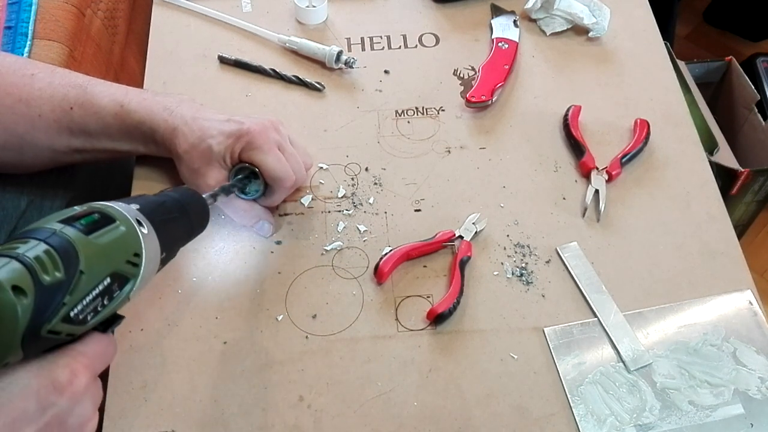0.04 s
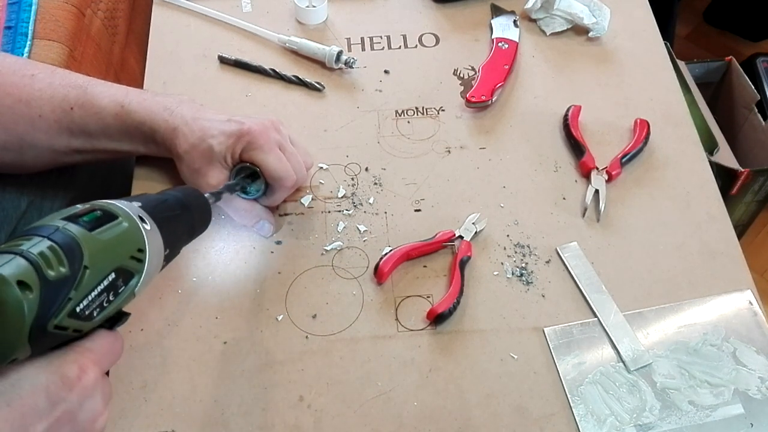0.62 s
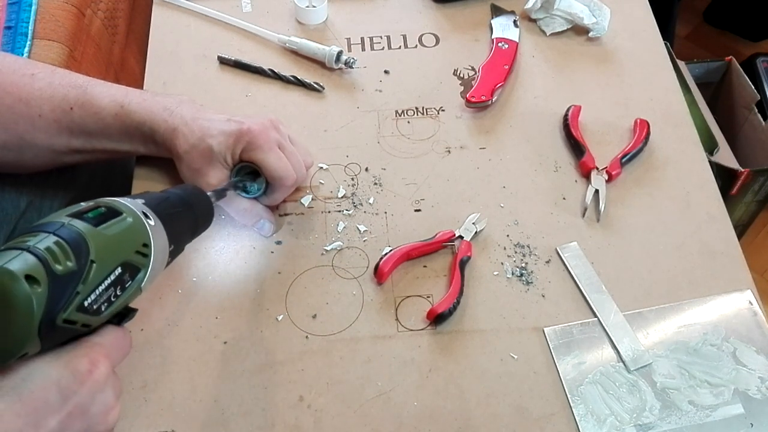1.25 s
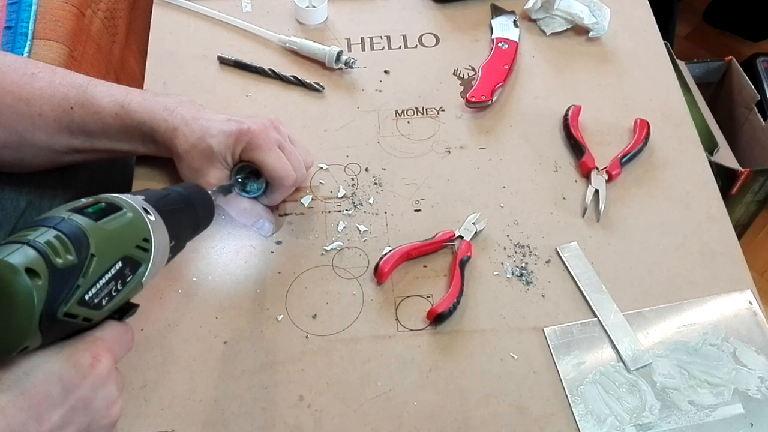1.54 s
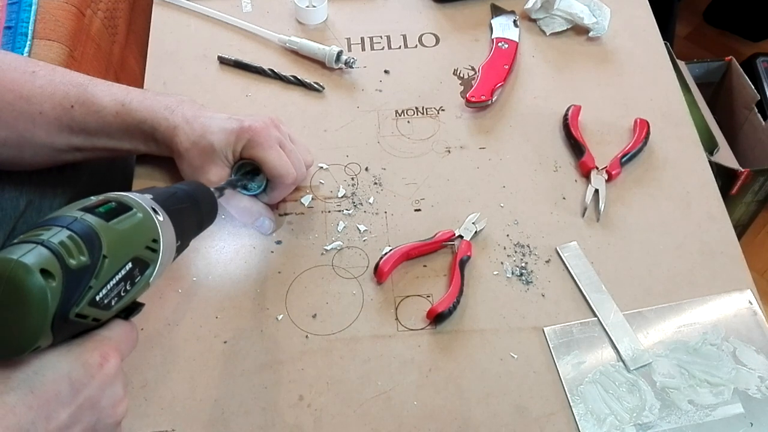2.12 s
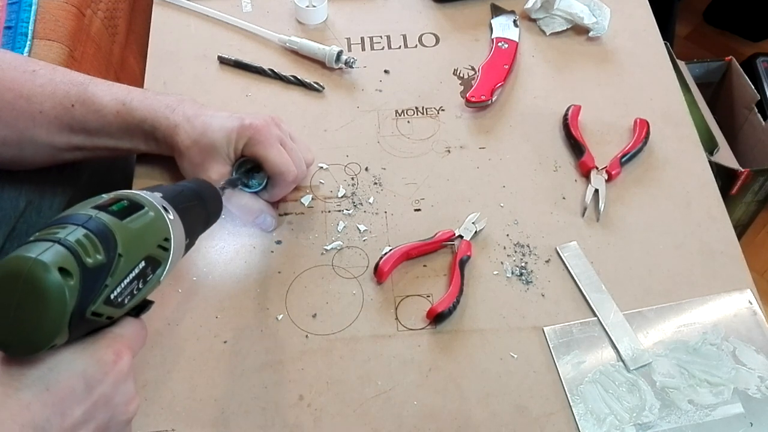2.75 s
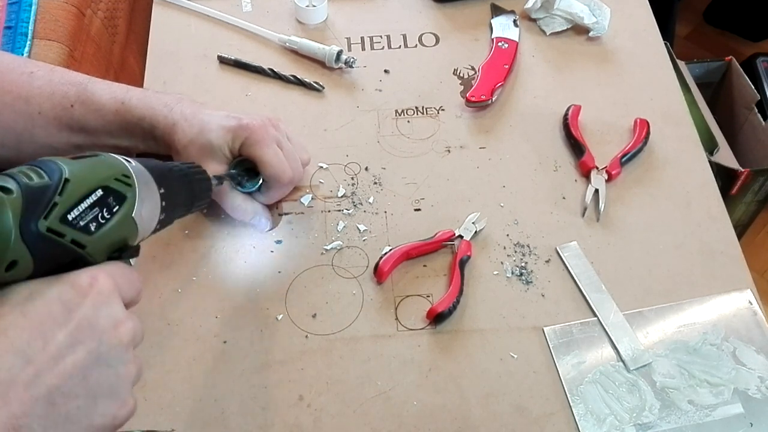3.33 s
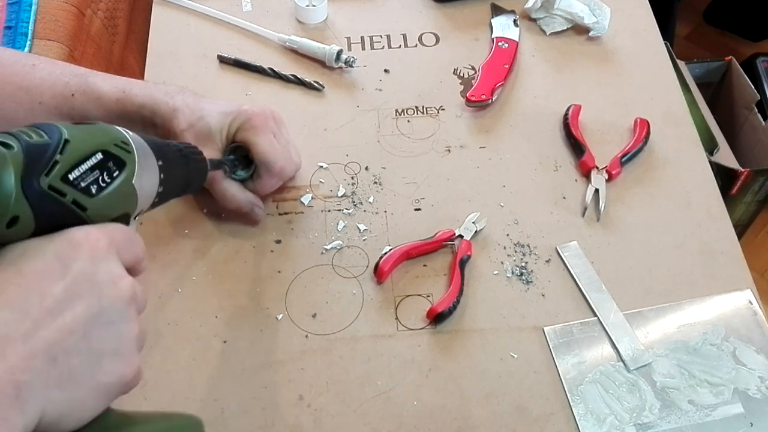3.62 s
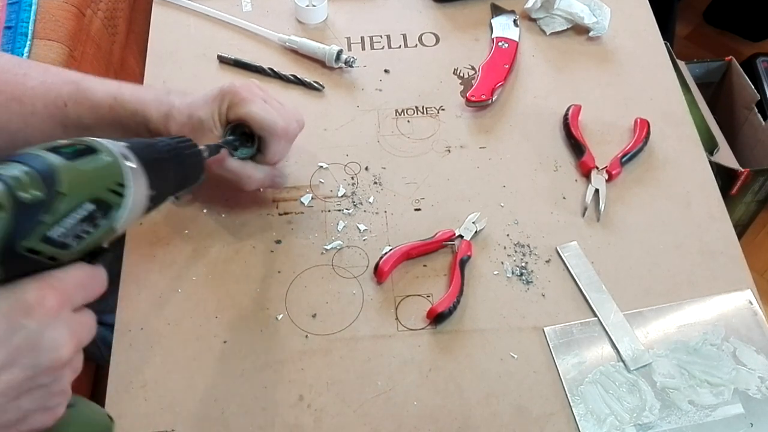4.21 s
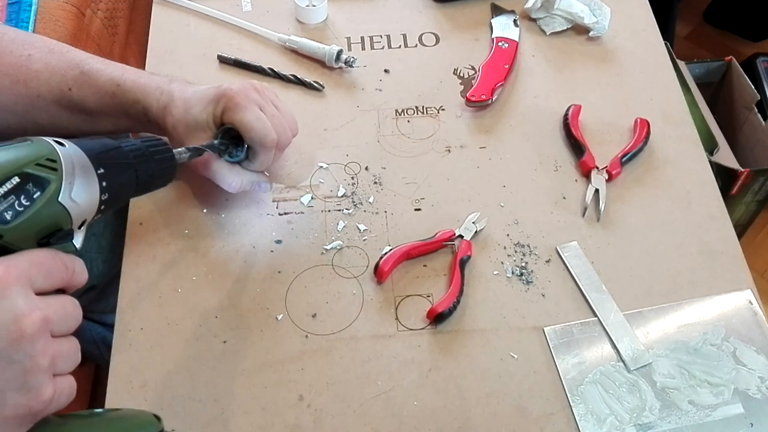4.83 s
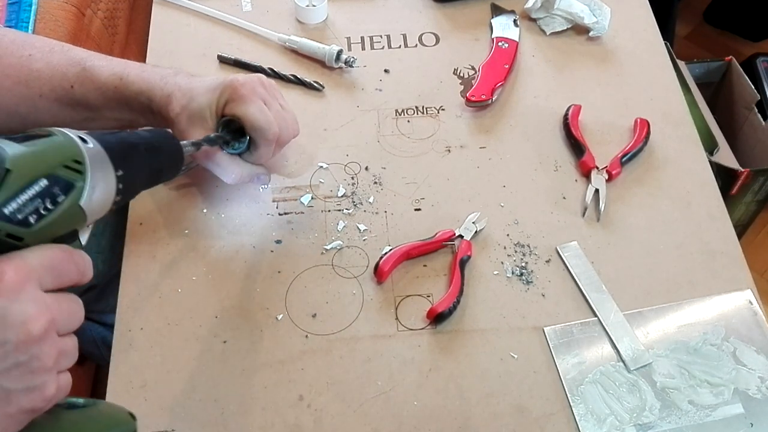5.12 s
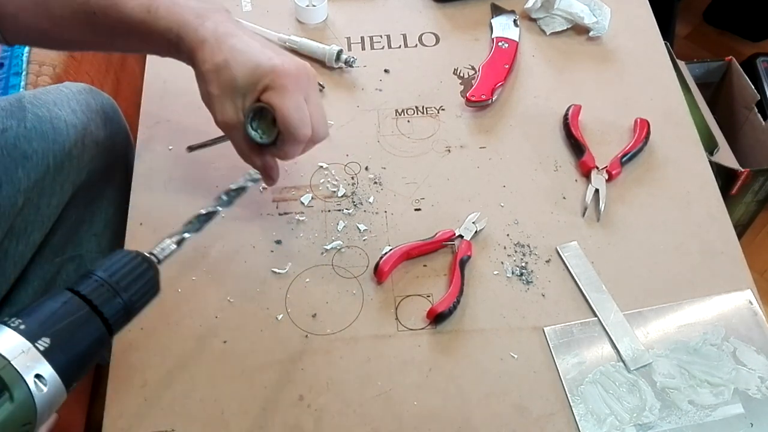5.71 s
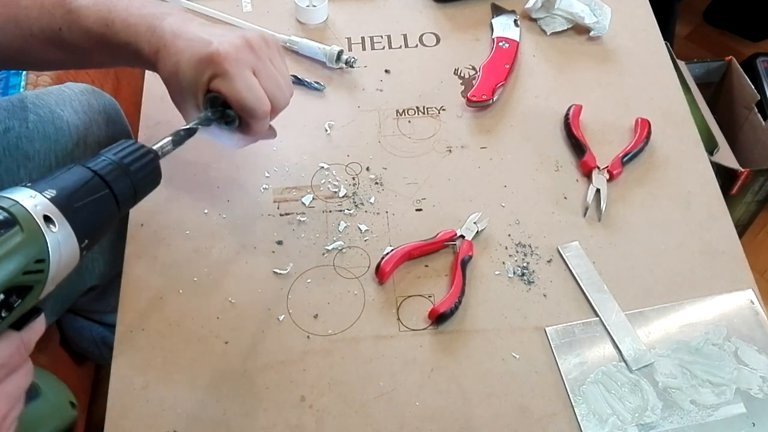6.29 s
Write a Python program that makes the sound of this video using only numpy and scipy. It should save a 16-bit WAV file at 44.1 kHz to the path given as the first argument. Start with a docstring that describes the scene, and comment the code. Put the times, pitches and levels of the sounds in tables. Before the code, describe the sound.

A cordless drill reams a tube with a sped-up, high pulsing whine, stops, then gives short trigger blips with clicks and ringing workbench knocks.

```python
"""At a workbench in a small room, a cordless drill reams a tube. Its meshing gears give tones over a
chatter of teeth. After half a second everything runs about four times as fast: the growl jumps to a
shrill whine that throbs as the bit binds once a chuck turn, over the scrape of the flutes, then winds down.
Short blips of the trigger follow, with clicks and ringing knocks of bit and tube, over a faint hum."""
import sys
import numpy as np
from scipy import signal
from scipy.fft import rfft, irfft, next_fast_len
from scipy.io import wavfile
from scipy.ndimage import uniform_filter1d

SR = 44100
rng = np.random.default_rng(int(sys.argv[2]) if len(sys.argv) > 2 else 0)


def waveform_to_disk(signal):
    """Save audio, clipped to [-1, 1], as 16-bit WAV at the path in sys.argv[1]."""
    frames = np.transpose(np.atleast_2d(signal))
    scaled = np.clip(frames, -1, 1) * 32767
    samples = np.round(scaled).astype(np.int16)
    wavfile.write(sys.argv[1], SR, samples)


N = 288855
TIME = np.arange(N) / SR
JUMP_S, SPEED_UP = 0.4695, 4.4
MESHES_PER_TURN, FIRST_BIND_S = 267.9, .477
FULL_HZ, SPEED_POWER = 2927, 2.27  # amplitude grows as this power of the mesh rate
ROOM_T60_S, TOP_HZ = 0.079, 15750


def drill_fast():
    """Load modulation: the bit binds once a turn, so speed and level throb until the drill runs free."""
    ream_hz, ream_gain = reaming_motor()
    free_hz, free_gain = free_motor()
    release_s, sag_share, sag_lag_turns = 3.08, 0.0116, .17
    chuck = chuck_turns(ream_hz, FIRST_BIND_S)
    load = np.clip((release_s - TIME) / 0.047, 0, 1)
    bind = np.cos(2 * np.pi * chuck) * load
    sag = sag_share * np.cos(2 * np.pi * (chuck - sag_lag_turns))
    mesh_hz = ream_hz * (1 - sag) + free_hz
    hardness = np.clip((mesh_hz - 700) / 1500, 0, 1)
    whine = reaming_whine(mesh_hz, bind)
    chirps = free_chirps(mesh_hz)
    chatter = tooth_chatter(mesh_hz, hardness)
    reaming = whine + chatter * undb(-3.5 + .5 * bind)
    free = chirps + chatter * undb(-1 - 1.5 * hardness)
    return (load * reaming + (1 - load) * free) * (ream_gain + free_gain)


# Gear tones under load. Each row: multiple of the mesh rate, relative level in dB.
LOADED_ORDERS = [(1, 1.5), (1.19, -16.5), (1.9, -10), (1.97, -8), (2, 0.5), (2.05, -9), (3, -3.5),
                 (3.31, -29), (3.53, -24.5), (3.94, -6.5), (4.031, -14), (5, -8), (6, -5)]
# Housing response at the fast pace. Each row: frequency in Hz, gain in dB.
HOUSING_FAST = [(300, -25), (1200, -24.5), (2150, -20), (2550, -11.5), (3000, -5.5), (3300, -6.5),
                (4500, -4.5), (5750, 1), (6500, -4), (7900, -6), (9000, -5), (11700, 1), (13400, -7),
                (15500, -7)]
def reaming_whine(mesh_hz, bind):
    """Source and filter: the tones of loaded gears radiate through gearbox and housing."""
    tones = gears(LOADED_ORDERS, mesh_hz, SPEED_UP, wobble=0.00405, rough=0.41, flutter_db=3.04)
    tones = room(gearbox(tones, SPEED_UP), ROOM_T60_S, wet_db=-6.5)
    whine = steady(colour(tones, HOUSING_FAST), seconds=0.051)
    # the lowest tone grows with speed and stays firm while the upper ones throb
    lowest = resonate(whine, hz=2766, width=370)
    upper = (whine - lowest) * undb(-1.0 + 3.23 * bind)
    return lowest * undb(np.interp(mesh_hz, [2650, 3000], [-6, 0])) + upper


# Speed while reaming. Each row: time in seconds, mesh rate before drag in Hz.
REAM_SPEED = [(.47, 2745), (1.15, 2775), (1.39, 2654.5), (1.43, 2930), (1.62, 3020), (2.96, 2925.5),
              (3.03, 2446), (3.063, 2018.5), (3.078, 1425.5), (3.19, -1)]
# Loudness while reaming. Each row: time in seconds, level in dB before throb and fade.
REAM_LEVEL = [(.47, -43), (1.35, -42.5), (1.54, -40), (1.6, -44), (1.9, -44), (2.15, -41), (2.95, -40),
              (3.03, -37), (3.08, -33.5)]
# Snags of the bit. Each row: centre in seconds, half length in seconds, share of speed lost.
BIT_SNAGS = [(0.492, .015, .08), (0.649, .035, 0.041), (0.934, .013, 0.094), (0.986, .025, .1),
             (1.549, .026, .12)]
def reaming_motor():
    """Load torque: snags drag the mesh rate down, and the gain dies away as the motor slows."""
    fade_below_hz = 2150
    drag = sum(share * np.exp(-((TIME - s) / half_s) ** 2) for s, half_s, share in BIT_SNAGS)
    mesh_hz = curve(REAM_SPEED) * (1 - drag)
    run_down = np.clip(mesh_hz / fade_below_hz, 0, 1) ** SPEED_POWER
    return mesh_hz, undb(curve(REAM_LEVEL)) * run_down


def chuck_turns(mesh_hz, from_s):
    """Gear reduction: the integrated mesh rate gives the turns of the chuck since from_s."""
    turns = np.cumsum(mesh_hz) / SR / MESHES_PER_TURN
    return turns - np.interp(from_s, TIME, turns)


def gears(orders, mesh_hz, pace, wobble, rough, flutter_db):
    """Gear meshing: tones at multiples of the tooth rate, shaken by backlash in speed, phase and level."""
    cycles = np.cumsum(mesh_hz * (1 + wobble * walk(40 * pace))) / SR
    out = np.zeros(N)
    for order, db in orders:
        shake = rough * order * walk(70 * pace)
        gain = undb(db + flutter_db * walk(45 * pace))
        below_top = order * mesh_hz < TOP_HZ
        out += below_top * gain * np.sin(2 * np.pi * order * cycles + shake)
    return out


# Gearbox modes at a pace of 1. Each row: frequency in Hz, bandwidth in Hz, gain in dB.
GEARBOX_RESONANCES = [(693, 17, 1), (1243, 140, -2.5), (1664, 20, 14), (2840, 330, -11)]
def gearbox(tones, pace):
    """Forced resonance: a tone flares as it crosses a mode of the gearbox."""
    return tones + sum(undb(db) * resonate(tones, hz * pace, width * pace)
                       for hz, width, db in GEARBOX_RESONANCES)


# Spectrum of barely turning gears. Each row: frequency in Hz, gain in dB.
IDLE_SPECTRUM = [(1000, -21), (2100, -18.5), (2900, -13), (4000, 1), (5500, 1), (7000, -6), (9000, -11),
                 (10500, -7), (11600, -2.5), (13000, -16), (15500, -20)]
def tooth_chatter(mesh_hz, hardness):
    """Impact noise: a slow motor hits its teeth softly, so its chatter is duller."""
    teeth = room(rattle(mesh_hz, SPEED_UP, depth=0.16, grain_db=2.5), ROOM_T60_S, wet_db=-4.0)
    bright, dull = unit(colour(teeth, HOUSING_FAST)), unit(colour(teeth, IDLE_SPECTRUM))
    return hardness * bright + (1 - hardness) * dull


def rattle(mesh_hz, pace, depth, grain_db):
    """Amplitude modulation: the noise of teeth and brushes pulses once a motor turn."""
    motor_turns = np.cumsum(mesh_hz) / SR / 5  # five meshes a turn
    pulse = 1 + depth * np.cos(2 * np.pi * motor_turns)
    return unit(rng.standard_normal(N) * pulse * undb(grain_db * walk(110 * pace)))


# Gear tones off load. Each row: multiple of the mesh rate, relative level in dB.
UNLOADED_ORDERS = [(1, 3.5), (2, 1), (2.4, -12), (3, -4), (3.5, -9.5), (4, -2.5), (5, -6), (6, -5.5)]
def free_chirps(mesh_hz):
    """Swept excitation: unloaded gear tones glide through one housing resonance, weaker at low speed."""
    tones = gears(UNLOADED_ORDERS, mesh_hz, SPEED_UP, wobble=.012, rough=.36, flutter_db=5)
    ring = undb(3.2) * resonate(tones, hz=3970, width=630)
    radiated = colour(room(tones + ring, ROOM_T60_S, wet_db=-16.0), HOUSING_FAST)
    chirps = steady(band(radiated, 3250, 21000), seconds=0.017)
    return chirps * undb(np.interp(mesh_hz, [700, 1700], [-10, -4]))


# Trigger squeezes. Each row: start in seconds, hold in seconds, target mesh rate in Hz,
# level at press and level at release in dB as at steady full speed.
TRIGGER_SQUEEZES = [(3.203, .03, 451.3, -35, -31), (3.268, .03, 451.4, -36, -32),
                    (3.394, 0.069, 642, -36, -40), (3.477, .04, 707, -25, -36.5),
                    (3.697, .042, 1035, -17.5, -30), (3.74, 0.022, 2197, -37, -32.5),
                    (3.952, 0.052, 1203, -26, -30), (4.012, 0.02, 2370, -31, -33.5),
                    (4.153, .056, 641, -27.5, -35.5), (4.306, .092, 913, -28, -41.5),
                    (4.497, 0.061, 764, -30.5, -33.5), (4.575, 0.067, 745, -27.5, -34.5),
                    (5.062, .075, 1017, -37, -40.5), (5.136, .024, 1750, -42, -38),
                    (5.158, 0.033, 2992, -42.5, -39), (5.282, .048, 1846, -29.5, -39.5),
                    (5.33, .075, 1960, -42.5, -52.5), (5.97, .065, 1651, -50.5, -44),
                    (6.036, .035, 2494, -53, -51), (6.072, .04, 2830, -46.5, -43),
                    (6.112, .068, 3124, -51, -52.5), (6.18, .062, 2925, -46.5, -40.5),
                    (6.324, 0.058, 846, -33.5, -45), (6.379, 0.023, 2101, -42, -43),
                    (6.404, 0.079, 3000, -44.5, -51)]
def free_motor():
    """First-order lag: each squeeze pulls the mesh rate towards a target, then the brake slows it."""
    spin_up_s, brake_hz_per_s = .018, 27000
    mesh_hz, db = np.zeros(N), np.zeros(N)
    for s, held_s, target_hz, press_db, release_db in TRIGGER_SQUEEZES:
        start = int(s * SR)
        t = TIME[:N - start]
        held = np.minimum(t, held_s)
        driven = target_hz + (mesh_hz[start] - target_hz) * np.exp(-held / spin_up_s)
        mesh_hz[start:] = np.maximum(driven - brake_hz_per_s * (t - held), 0)
        db[start:] = press_db + (release_db - press_db) * held / held_s
    # gears strained by speeding up or braking are louder
    strain = 1 + 0.46 * np.abs(np.gradient(mesh_hz)) * SR / brake_hz_per_s
    gain = undb(db) * (mesh_hz / FULL_HZ) ** SPEED_POWER * strain
    return mesh_hz, uniform_filter1d(gain, SR // 100)


# Speed before the jump. Each row: time in seconds, mesh rate in Hz.
SLOW_SPEED = [(0, 668.3), (.07, 646), (.1, 680), (.16, 658), (.24, 650), (.33, 554.5), (.41, 565),
              (.43, 624)]
# Housing response before the jump. Each row: frequency in Hz, gain in dB.
HOUSING_SLOW = [(60, -19), (165, -8), (380, -14), (640, -8.5), (1320, 0), (1550, -2.5), (2100, -7.5),
                (2700, 1.5), (3700, -6.5), (5000, -7), (7000, -14.5), (10000, -27), (14000, -28),
                (15000, -60)]
def drill_slow():
    """Gear meshing at natural pace: a growl and a thin whistle swell as the bit bites four times a turn."""
    whistle_hz, level_db, bite_db = 5915, -42.5, 1.3
    mesh_hz = curve(SLOW_SPEED)
    tones = gears(LOADED_ORDERS, mesh_hz, pace=1.0, wobble=.006, rough=0.4, flutter_db=4.3)
    tones = band(gearbox(tones, pace=0.99), 1000, 14000)
    tones = room(tones, ROOM_T60_S * SPEED_UP, wet_db=-6.0)
    chatter = rattle(mesh_hz, pace=0.7, depth=0.14, grain_db=0.5)
    growl = steady(colour(tones, HOUSING_SLOW), 0.13) + undb(-3.0) * unit(colour(chatter, HOUSING_SLOW))
    whistle = undb(-15 + 1.5 * walk(33)) * np.sin(2 * np.pi * whistle_hz * TIME + walk(29))
    bite = np.cos(2 * np.pi * 4 * chuck_turns(mesh_hz, from_s=0.049))
    return (steady(growl, 0.035) + whistle) * undb(level_db + bite_db * bite)


# Loudness of the cut. Each row: time in seconds, level in dB.
SCRAPE_LEVEL = [(.47, -63), (.9, -63.5), (1.4, -59.5), (1.9, -62.5), (2.2, -65.5), (2.6, -72),
                (2.95, -69.5), (3.1, -104)]
# Spectrum of the cut. Each row: frequency in Hz, gain in dB.
SCRAPE_SPECTRUM = [(60, -15), (170, -13.5), (450, -4), (640, 1), (800, -12), (1200, -7), (2000, -19.5)]
def cutting():
    """Friction noise: the two flutes scrape the tube in low, uneven pulses."""
    flute_db, lag_turns = 1.5, .1
    mesh_hz, _ = reaming_motor()
    chuck = chuck_turns(mesh_hz, FIRST_BIND_S)
    pulse_db = flute_db * np.cos(2 * np.pi * 2 * (chuck - lag_turns))
    scrape = rng.standard_normal(N) * undb(pulse_db + 2.7 * walk(90) + 1.4 * walk(14))
    return unit(colour(scrape, SCRAPE_SPECTRUM)) * swell(SCRAPE_LEVEL)


# Contacts of trigger, bit and tube. Each row: start in seconds, level in dB with the energy
# spread over 4 ms, relative gain of the top band in dB, 60 dB decay time in seconds.
CONTACTS = [(3.415, -64, -15, 0.0048), (3.5323, -50, 0, 0.0029), (3.5782, -45, -8, 0.0054),
            (3.7429, -32, -11, 0.011), (3.745, -29, 33, 0.026), (3.8452, -42, 6, 0.0055),
            (3.878, -44, 1.5, 0.0021), (3.883, -46.5, -9, 0.0028), (3.922, -61, 8, .003),
            (4.0502, -32, -2, 0.0036), (4.099, -57, -9, 0.0036), (4.349, -54, -4, .01),
            (4.935, -54, -4, 0.031), (4.9968, -52, -1, .003), (5.0021, -42.5, -10, 0.0052),
            (5.006, -41, 5, 0.0019), (5.683, -67, 2, 0.0089), (5.738, -53.5, 9, 0.017),
            (5.803, -47.5, 1, 0.013), (5.813, -53, -24, 0.0015), (5.870, -60.5, 9, 0.0069)]
def clicks():
    """Hard impact: a brief contact has a broad spectrum, a bright snap with little body."""
    out, t = np.zeros(N), TIME[:SR // 10]
    for s, db, top_db, t60 in CONTACTS:
        burst = rng.standard_normal(len(t)) * fade(t, t60)
        top = undb(top_db) * band(burst, 11100, 16400)
        body = undb(-21) * band(burst, 930, 2100)
        snap = band(burst, 4180, 6450) + top + body
        rms = np.sqrt(np.sum(snap ** 2) / (.004 * SR))
        add(out, s, undb(db) * snap / rms)
    return room(out, ROOM_T60_S, wet_db=-3.0)


# Knocks as the bit catches in the tube. Each row: start in seconds, gain in dB, relative gain of the thud in
# dB, # 60 dB decay time in seconds.
BIT_KNOCKS = [(3.743, -33.5, -15, 0.038), (3.882, -41.5, -18, .03), (4.023, -42, 7.5, 0.058),
              (4.034, -34, 4, 0.051), (4.052, -33.5, -1.5, 0.031), (5.181, -44.5, -28, 0.056),
              (5.522, -35, -34, 0.045), (6.248, -38.5, -10.5, 0.093)]
# Modes of the tube. Each row: frequency in Hz, bandwidth in Hz, gain in dB.
TUBE_RESONANCES = [(675, 71, 0.5), (1190, 260, 1), (2380, 820, -13), (4500, 840, -9.5), (5390, 89, 10),
                   (6800, 990, 3), (8300, 370, 1.5), (13600, 620, -17), (13700, 2000, 4.5)]
def knocks():
    """Modal ringing: when the bit catches, the tube rings over a dull low thud."""
    out, t = np.zeros(N), TIME[:SR // 5]
    for s, db, thud_db, t60 in BIT_KNOCKS:
        blow = rng.standard_normal(len(t)) * fade(t, t60)
        ring = sum(undb(mode_db) * resonate(blow, hz, width) for hz, width, mode_db in TUBE_RESONANCES)
        thud = undb(thud_db) * band(blow, 180, 690)
        add(out, s, undb(db) * (ring + thud))
    return room(out, ROOM_T60_S, wet_db=-8)


# Loudness of the hum. Each row: time in seconds, level in dB.
HUM_ENVELOPE = [(.5, -81.5), (1.4, -73.5), (4.5, -82), (6.5, -79)]
# Spectrum of the room tone. Each row: frequency in Hz, gain in dB.
ROOM_SPECTRUM = [(15, -49), (25, -14.5), (58, -18.5), (87, -11), (130, -7.5), (175, -13), (1130, -17),
                 (1700, -27.5), (1840, -28), (2550, -26), (13600, -29), (14800, -30.5), (16000, -22)]
def background():
    """Noise floor: faint broadband room tone and a hum that wavers in phase and level."""
    hum_hz, room_db = 118.3, -74.5
    hum = np.sin(2 * np.pi * hum_hz * TIME + 0.53 * walk(7.6)) * undb(2 * walk(24))
    room_tone = colour(rng.standard_normal(N), ROOM_SPECTRUM)
    return undb(room_db) * unit(room_tone) + undb(curve(HUM_ENVELOPE)) * unit(hum)


def room(x, t60, wet_db):
    """Reverberation: a diffuse, decaying tail follows the direct sound."""
    t = TIME[:SR // 2]
    tail = rng.standard_normal(len(t)) * fade(t, t60) * (1 - fade(t, t60 / 10))
    return x + undb(wet_db) * signal.fftconvolve(x, tail / np.linalg.norm(tail))[:N]


def resonate(x, hz, width):
    """Second-order resonance, gain 1 at its centre."""
    return signal.lfilter(*signal.iirpeak(hz, hz / width, SR), x)


def colour(x, points):
    """Spectral shaping by (Hz, dB) points."""
    hz, db = np.transpose(points)
    size = 2 * next_fast_len(len(x) // 2 + 2048)
    freq = np.maximum(np.fft.rfftfreq(size, 1 / SR), 1)
    gain = undb(np.interp(np.log(freq), np.log(hz), db))
    return irfft(rfft(x, size) * gain)[:len(x)]


def band(x, lo_hz, hi_hz):
    """Causal band-pass filtering."""
    return signal.sosfilt(signal.butter(2, [lo_hz, hi_hz], "band", fs=SR, output="sos"), x)


def steady(x, seconds):
    """Division by the running rms holds the slow level at 1 and keeps the fast flutter."""
    return x / np.sqrt(np.abs(uniform_filter1d(x ** 2, int(seconds * SR))) + 1e-12)


def fade(t, t60):
    """Exponential decay, 60 dB in t60."""
    return np.exp(-np.log(1000) * t / t60)


def walk(rate):
    """Interpolated noise of rms 1, with rate new values a second."""
    return unit(np.interp(TIME * rate, np.arange(N), rng.standard_normal(N)))


def curve(rows):
    """Linear interpolation of (s, value) rows."""
    return np.interp(TIME, *np.transpose(rows))


def swell(rows):
    """Gain envelope of (s, dB) rows, silent outside them."""
    db = np.interp(TIME, *np.transpose(rows), left=-200, right=-200)
    return uniform_filter1d(undb(db), 64)


def undb(db):
    """Decibels to gain."""
    return 10 ** (np.asarray(db) / 20)


def unit(x):
    """Normalisation to rms 1."""
    return x / np.sqrt(np.mean(x ** 2))


def add(out, s, sound):
    """Superposition of a sound starting at time s."""
    start = int(s * SR)
    out[start:start + len(sound)] += sound[:N - start]


def scene():
    """Superposition: the slow drill gives way to the fast one and its surroundings, in both channels."""
    fast = np.clip((TIME - JUMP_S) * 1000, 0, 1)  # 1 ms crossfade
    mono = (1 - fast) * drill_slow()
    mono += fast * (drill_fast() + cutting() + clicks() + knocks() + background())
    return np.array([mono, mono])


def record(dry):
    """Band limiting: a steep low-pass removes the highest treble."""
    return signal.sosfilt(signal.ellip(10, .2, 80, TOP_HZ, fs=SR, output="sos"), dry)


dry = scene()
out = record(dry)
waveform_to_disk(out)
```